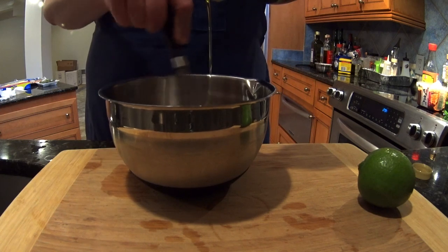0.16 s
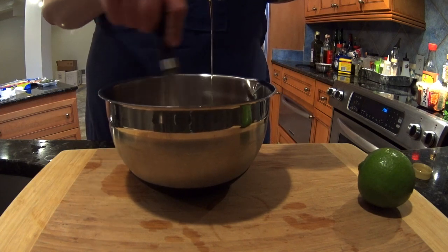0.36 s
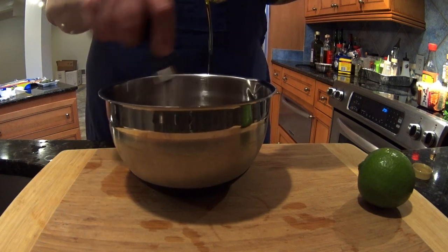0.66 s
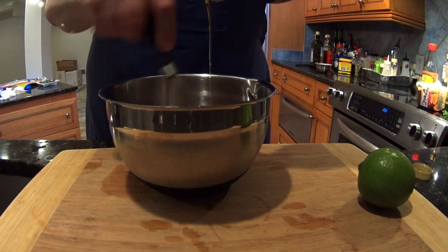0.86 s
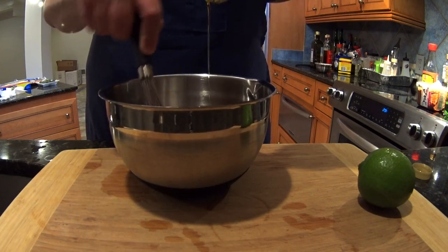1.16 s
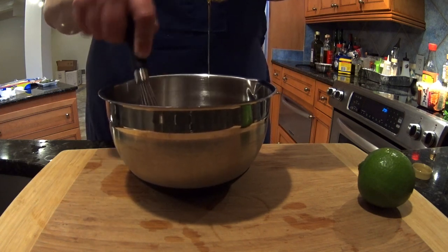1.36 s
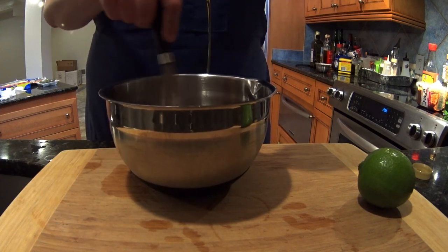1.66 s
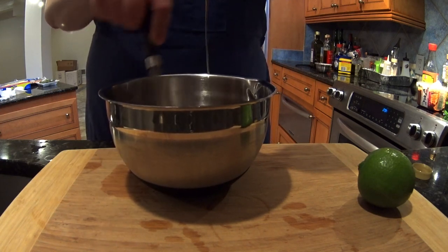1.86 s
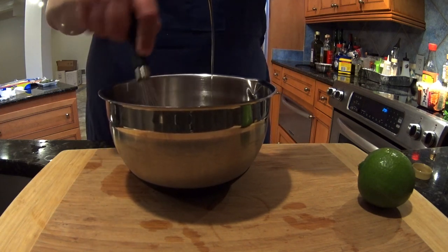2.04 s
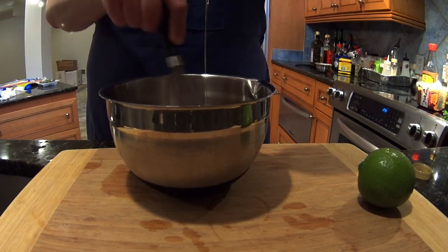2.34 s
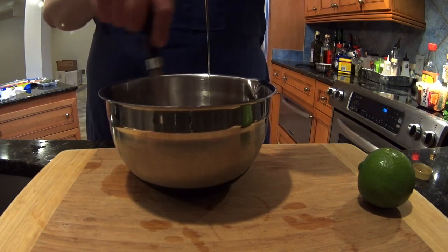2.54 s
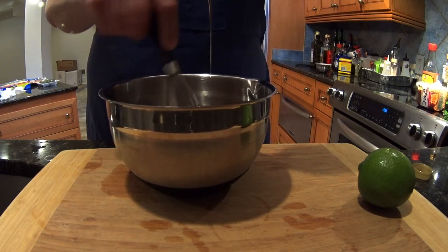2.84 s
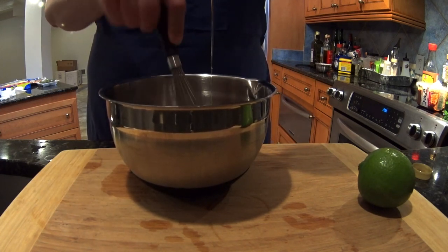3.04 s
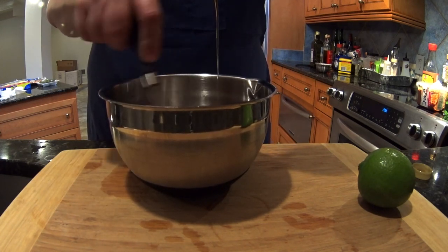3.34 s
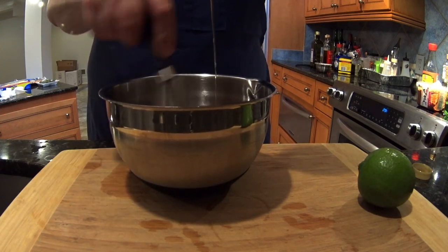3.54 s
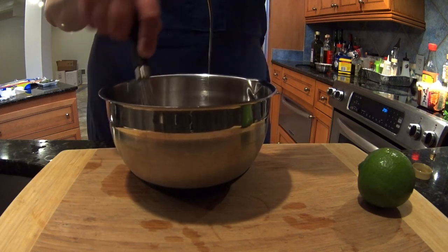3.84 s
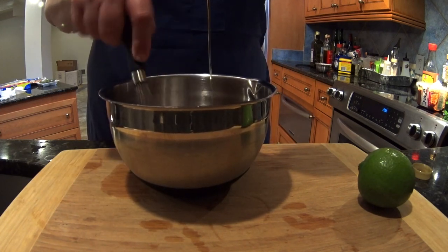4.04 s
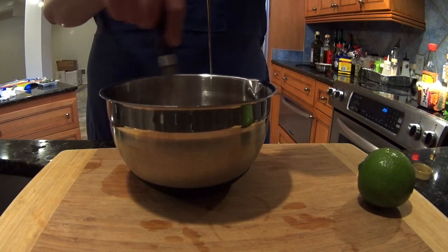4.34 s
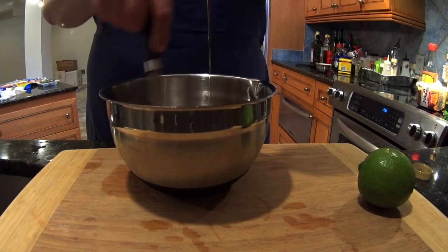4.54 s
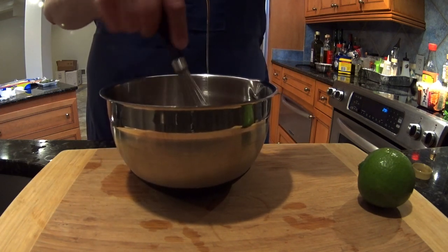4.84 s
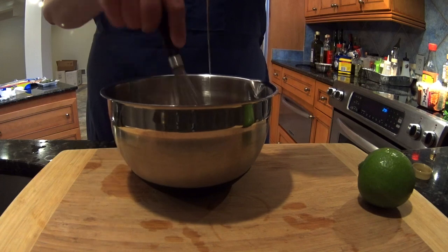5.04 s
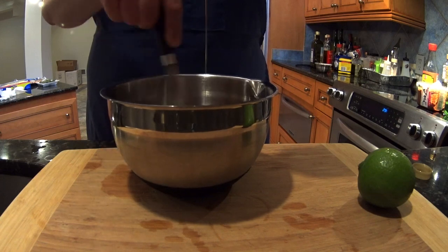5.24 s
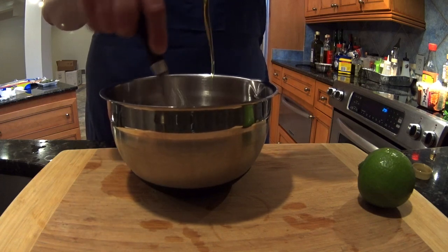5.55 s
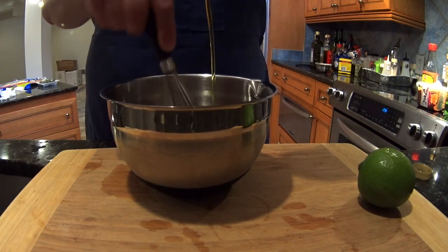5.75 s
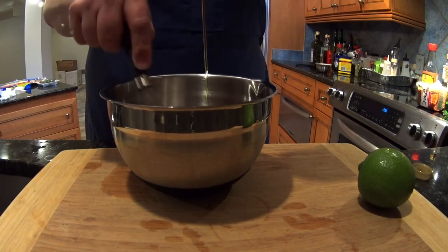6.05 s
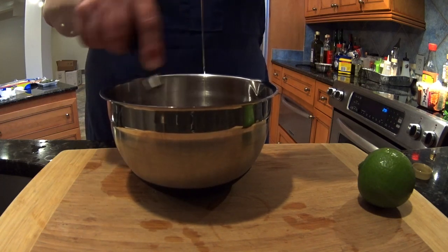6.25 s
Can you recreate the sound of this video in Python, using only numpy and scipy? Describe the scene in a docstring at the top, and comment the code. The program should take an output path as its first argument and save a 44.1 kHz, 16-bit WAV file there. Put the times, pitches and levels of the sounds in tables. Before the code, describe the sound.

A wire whisk beats a thick paste in a steel bowl, heard close up. From the first moment the wires click, rattle and scrape on the wall in quick, uneven strokes, bright and metallic but damped by the paste. Beneath them the rocking bowl gives soft, woody thuds and a slight grinding on a wooden board. At about 0.4 seconds comes the first of a dozen scattered blows that set the bare rim ringing lightly, clearest around 1.7, 3.3, 4.4 and 5.3 seconds. The thuds are strongest between 4.4 and 5 seconds, where the clicking is also busy. From about 5.6 seconds the beating eases briefly, then the scraping swells with a sharp click just before the sound ends at 6.4 seconds. The small kitchen adds a very short echo and a faint, steady low hum.

```python
"""A wire whisk beats a thick paste in a steel bowl on a wooden board, in a small, humming kitchen.
From the first moment the wires rattle and scrape on the wall, which the paste muffles, and the
rocking bowl thuds on the board. At 0.4 seconds comes the first of a dozen blows that set the bare
rim ringing. The thuds are strongest between 4.4 and 5 seconds. The beating then eases briefly,
and the scraping swells as the sound ends at 6.4 seconds."""
import sys
import numpy as np
from scipy import signal
from scipy.fft import rfft, irfft
from scipy.io import wavfile
from scipy.ndimage import uniform_filter1d

SR = 44100
rng = np.random.default_rng(int(sys.argv[2]) if len(sys.argv) > 2 else 0)


def master_out(mix):
    """Clip the mix to full scale and print it as 16-bit PCM to the path in sys.argv[1]."""
    frames = np.transpose(np.atleast_2d(mix))
    ceiling = np.clip(frames, -1, 1)
    pcm = np.round(ceiling * 32767).astype(np.int16)
    wavfile.write(sys.argv[1], SR, pcm)


N = 282240

# Wires landing on the wall. Each row: start in seconds, peak level of the body in dB, levels of the
# boom, clank and sizzle in dB, pitches of the boom, clank and bright spot in Hz, strength of that spot
# in dB, rattle length in seconds.
WIRE_HITS = [(0.054, -26.5, -35.5, -35, -29, 636, 1750, 4190, 21.5, 0.052),
             (0.0715, -17.5, -52, -39, -40, 770, 1400, 4730, 19, 0.025),
             (0.107, -31, -54, -39.5, -50, 780, 1380, 3130, 14, 0.16),
             (0.1698, -25, -51, -39, -39, 624, 1800, 2830, 6, 0.057),
             (0.189, -16.5, -38, -41, -27, 793, 1650, 6650, 10, 0.088),
             (0.253, -29, -49, -44, -36, 473, 1245, 4550, 24, 0.14),
             (0.3712, -21.5, -44, -33, -55, 594, 1760, 3900, 6, 0.067),
             (0.3824, -22, -42.5, -37, -40, 660, 1337, 3760, 7, 0.082),
             (0.3958, -19, -33.5, -36, -27, 790, 1260, 6500, -7, 0.11),
             (0.4724, -35, -42, -46, -39.5, 683, 1190, 5000, 16, 0.098),
             (0.4834, -22, -41.5, -39, -44, 540, 1315, 2700, 8.5, 0.046),
             (0.5121, -36, -55, -67, -46, 560, 1540, 5260, 29, 0.095),
             (0.5282, -17, -57, -34.5, -44, 748, 1430, 2855, 28, 0.08),
             (0.5837, -19, -51, -42, -56, 770, 1710, 2980, 6, 0.088),
             (0.606, -12, -37, -21.5, -35, 647, 1173, 2960, 9, 0.057),
             (0.6926, -23, -41.5, -39, -30.5, 627, 1167, 2820, 16, 0.081),
             (0.766, -23, -66, -45, -49, 660, 1460, 2670, 9, 0.11),
             (0.812, -17.5, -42, -28, -34.5, 740, 1272, 4100, -8, 0.068),
             (0.828, -14.5, -41, -36, -37, 806, 1360, 3100, 4, 0.04),
             (0.8615, -30, -59, -37, -43, 670, 1370, 3100, 8.5, 0.071),
             (0.875, -23.5, -53, -30.5, -47, 684, 1446, 4250, 18, 0.041),
             (0.9119, -19.5, -35.5, -35, -30, 604, 1300, 3200, 14, 0.072),
             (1.0225, -17.5, -52, -31, -43, 630, 1266, 3620, 17, 0.077),
             (1.119, -18.5, -64, -59, -36.5, 894, 1490, 2650, 13, 0.091),
             (1.1324, -24, -34.5, -41, -36, 644, 1310, 4200, 10, 0.044),
             (1.1808, -18.5, -49, -42, -41, 715, 1310, 3190, 8.5, 0.05),
             (1.23, -19, -51, -37, -32, 626, 1270, 3170, 14, 0.13),
             (1.2902, -52, -55, -34.5, -64, 673, 1280, 2790, 8.5, 0.047),
             (1.3324, -20.5, -44, -37, -36.5, 597, 1294, 2880, 16, 0.16),
             (1.3875, -12, -52, -53, -34.5, 620, 1950, 3100, 14, 0.051),
             (1.4355, -23, -48, -36, -48, 614, 1294, 3000, 5, 0.072),
             (1.4509, -21, -49, -34, -43, 790, 1315, 4900, 14, 0.065),
             (1.5227, -21.5, -66, -65, -53, 770, 1640, 2870, 26, 0.038),
             (1.55, -19.5, -41.5, -35, -35, 495, 1300, 2820, 21, 0.053),
             (1.5894, -25, -53, -62, -38, 623, 1400, 4470, 4, 0.027),
             (1.6055, -30, -45, -30.5, -63, 750, 1810, 2780, 21, 0.064),
             (1.6426, -25, -53, -37, -52, 710, 1380, 3080, 20, 0.049),
             (1.7286, -25.5, -58, -39, -58, 620, 1330, 3960, 23, 0.074),
             (1.7845, -11.5, -34.5, -33.5, -30, 717, 1340, 2800, -8, 0.058),
             (1.963, -25, -53, -28.5, -43, 610, 1293, 3000, -3, 0.048),
             (2.127, -24, -52, -29, -57, 715, 1280, 3600, 21, 0.066),
             (2.2228, -25.5, -55, -47, -40.5, 584, 1790, 3120, 18, 0.18),
             (2.2351, -14.5, -31, -33, -28.5, 630, 1870, 2780, 14, 0.025),
             (2.285, -31, -43.5, -34.5, -42, 685, 1860, 2880, 13, 0.11),
             (2.334, -34, -69, -35, -52, 870, 1820, 2970, 3, 0.11),
             (2.3646, -25, -44, -32, -30, 764, 1368, 7440, -15, 0.089),
             (2.4406, -18.5, -40.5, -38, -34.5, 633, 1277, 2710, 8, 0.13),
             (2.483, -32, -64, -59, -41, 810, 1440, 2800, 7, 0.11),
             (2.5779, -19, -53, -36.5, -51, 720, 1290, 3730, 17, 0.075),
             (2.6354, -29, -76, -43, -63, 684, 1500, 2820, 15, 0.045),
             (2.6841, -17.5, -36.5, -58, -35, 660, 1300, 2920, 5, 0.091),
             (2.7236, -16.5, -51.5, -36.5, -48, 780, 1266, 4130, 22, 0.12),
             (2.7905, -21.5, -48, -34, -57, 654, 1385, 2930, 3, 0.056),
             (2.819, -18, -54, -45, -32.5, 626, 1410, 6900, 14, 0.049),
             (2.9076, -16.5, -34.5, -43, -35, 588, 1286, 3400, 5, 0.065),
             (2.9427, -37, -54, -52, -49, 720, 1460, 3020, 13, 0.25),
             (3.026, -27, -63, -63, -33.5, 705, 1560, 6810, 15, 0.14),
             (3.114, -26, -56, -64, -38, 660, 1290, 4100, 9, 0.29),
             (3.1389, -20.5, -38, -35, -32.5, 490, 1440, 7000, 8, 0.068),
             (3.2105, -27, -65, -42, -40.5, 796, 1315, 7150, 11, 0.18),
             (3.2465, -25, -47, -37, -29, 580, 1307, 4000, 5, 0.046),
             (3.3142, -44, -62, -25.5, -41, 598, 1320, 4160, 27, 0.02),
             (3.355, -22, -37, -32.5, -29.5, 625, 1168, 3320, 25, 0.043),
             (3.3642, -17.5, -57, -51, -54, 656, 1350, 4030, 3, 0.13),
             (3.495, -18, -41.5, -35, -36.5, 810, 1746, 2920, 9, 0.046),
             (3.5254, -47, -42, -60, -28, 624, 1800, 6900, 1, 0.047),
             (3.5822, -29, -39, -34.5, -30.5, 593, 1290, 6560, -6, 0.04),
             (3.6245, -35, -45, -56, -42, 806, 1320, 4330, 10, 0.16),
             (3.691, -22, -46, -34.5, -50, 740, 1275, 3250, 6, 0.068),
             (3.708, -21, -46, -32, -51, 770, 1320, 3700, 26, 0.031),
             (3.798, -15, -52, -44, -36, 790, 1180, 2680, 18, 0.11),
             (3.8793, -33, -47, -41, -51, 790, 1370, 2940, 6, 0.11),
             (3.9136, -21, -55, -30.5, -59, 710, 1263, 2900, 3, 0.071),
             (3.937, -21.5, -41, -55, -40, 820, 1250, 3600, 14, 0.055),
             (3.964, -34, -46, -45, -33.5, 650, 1840, 6570, 9, 0.079),
             (4.003, -30, -54, -43, -43, 700, 1230, 2670, 35, 0.047),
             (4.0287, -22.5, -37, -47, -31, 820, 1260, 3280, 16, 0.049),
             (4.0484, -21.5, -46, -41, -51, 800, 1820, 2730, 28, 0.043),
             (4.1247, -19.5, -66, -34, -54, 700, 1318, 4950, 23, 0.29),
             (4.1751, -16, -39.5, -32.5, -30, 790, 1397, 6770, 8, 0.05),
             (4.247, -27, -39, -43, -29.5, 500, 1230, 7160, 1, 0.059),
             (4.2855, -21, -38.5, -47, -47, 732, 1480, 4530, 12, 0.086),
             (4.345, -31, -44, -39.5, -31.5, 799, 1510, 7240, 4, 0.048),
             (4.371, -20.5, -43, -44, -32.5, 805, 1700, 3720, 7, 0.082),
             (4.469, -23, -35.5, -30, -32, 490, 1215, 4310, 20, 0.059),
             (4.584, -20, -45, -40, -44, 840, 1294, 2710, -6, 0.15),
             (4.6932, -20, -40, -40.5, -33.5, 557, 1460, 2700, 4, 0.078),
             (4.7342, -23, -39, -46, -58, 650, 1670, 4260, 8, 0.079),
             (4.8092, -15, -46.5, -33, -61, 490, 1290, 3100, 10, 0.062),
             (4.8367, -17, -57, -36, -39, 810, 1370, 3670, 9, 0.073),
             (4.9117, -22.5, -34, -42, -32.5, 635, 1250, 2960, 15, 0.059),
             (4.959, -30, -56, -44, -51, 670, 1860, 4200, 18, 0.075),
             (5.0265, -20, -55, -40, -31, 644, 1560, 3070, 10, 0.12),
             (5.0496, -17.5, -64, -32, -41, 660, 1367, 4030, 16, 0.038),
             (5.0914, -20, -50, -30, -51, 684, 1427, 4000, 12, 0.04),
             (5.1417, -18, -31, -39.5, -24.5, 645, 1320, 3600, 16, 0.03),
             (5.1737, -34, -40, -44, -55, 720, 1380, 2730, 7, 0.051),
             (5.241, -15, -39.5, -42, -49, 650, 1490, 2900, -2, 0.053),
             (5.2554, -22, -51, -39, -26.5, 586, 1760, 6820, 11, 0.083),
             (5.2968, -25, -68, -28.5, -56, 643, 1393, 3800, 21, 0.058),
             (5.365, -18, -31, -36, -29.5, 666, 1360, 2880, -4, 0.058),
             (5.455, -22, -59, -35, -45, 785, 1400, 3100, 0, 0.06),
             (5.4866, -18.5, -71, -44, -51, 663, 1300, 2770, -1, 0.07),
             (5.5541, -19, -66, -40, -72, 615, 1280, 3550, -2, 0.066),
             (5.5939, -22, -34.5, -37, -58, 735, 1340, 2660, 24, 0.065),
             (5.6543, -34, -67, -39, -66, 730, 1290, 3850, 0, 0.057),
             (5.7095, -26, -49, -53, -39, 790, 1530, 3100, 5, 0.047),
             (5.756, -24.5, -63, -44, -47, 580, 1260, 4740, 17, 0.085),
             (5.8131, -29.5, -69, -66, -44, 705, 1850, 4140, 23, 0.17),
             (5.9204, -26.5, -44.5, -44, -73, 650, 1320, 3050, 22, 0.034),
             (5.9608, -27, -46.5, -52, -39.5, 600, 1264, 6750, 0, 0.066),
             (6.042, -23, -40.5, -35.5, -32.5, 580, 1320, 2720, 25, 0.063),
             (6.0661, -21, -30.5, -48, -42, 788, 1850, 2630, 23, 0.06),
             (6.138, -20, -61, -60, -68, 635, 1450, 3950, -5, 0.1),
             (6.1639, -25, -44.5, -36, -47, 632, 1314, 2960, 14, 0.13),
             (6.225, -22.5, -51, -52, -48, 660, 1340, 4180, 25, 0.048),
             (6.267, -14, -35, -41, -31.5, 740, 1880, 4070, 16, 0.052),
             (6.3063, -19, -68, -46, -36, 762, 1900, 2810, 25, 0.097)]
# The wall's modes (its natural tones) under the paste. Each row: width in Hz, level in dB.
WALL_MODES = [(14, -6), (74, -1.5), (39.8, -3.5), (104, -1.5), (28.6, 3.5), (53.3, 4.5), (64.6, 1),
              (29.5, 7), (73.5, 8.5), (60.4, 10.5), (60.4, 3), (100, 8), (86.5, 1.5), (55.6, 2.5),
              (194, -1.5), (97, 6), (88.6, -4.5), (11.6, 6), (16, 2), (17.9, 3.5), (29.3, -2.5), (30, -8),
              (13.8, -11), (24.9, 5), (87.5, -4.5), (80, 0.5), (810, -9.5)]


def wire_rattles(size=4096):
    """Wires land one after another in short rattles that shake the wall; light touches fall at random."""
    # One wire snapping on the wall. Each row: the same as in WIRE_HITS, without the rattle length.
    snaps = [(0.2756, -10.5, -42, -43, -48, 620, 1940, 2780, 28),
             (0.539, -16, -40, -37, -37, 710, 1440, 2590, 19),
             (0.7388, -12.5, -58, -34, -41, 660, 1760, 2830, 21),
             (1.047, -16.5, -50, -34, -38, 780, 1370, 3150, 9),
             (1.6715, -21.5, -50, -42, -30.5, 802, 1870, 3800, 1),
             (1.9905, -15.5, -36.5, -41, -39.5, 713, 1303, 3000, 16),
             (2.0339, -13, -45, -40, -42.5, 755, 1310, 4150, 5),
             (2.502, -11.5, -48, -32, -35.5, 726, 1430, 2930, 14),
             (3.4058, -13.5, -53, -33, -33.5, 676, 1315, 4160, 23),
             (3.467, -15, -56, -39, -51, 644, 1760, 4330, 13),
             (3.8505, -28, -42.5, -30.5, -47, 720, 1320, 4800, 25),
             (4.3003, -13, -40, -42.5, -29, 780, 1370, 4540, 16.5),
             (4.774, -15.5, -42, -27.5, -39, 650, 1315, 2820, 12),
             (4.9829, -10.5, -34.5, -34.5, -33.5, 626, 1295, 4640, 20),
             (5.3907, -10, -63, -58, -44, 610, 1580, 5090, 22),
             (5.4093, -12, -47, -27, -33, 727, 1355, 2980, 18),
             (6.3375, -9, -44, -34, -39, 759, 1820, 4350, 12),
             (0.8041, -25, -42, -33, -33, 630, 1370, 2730, 6),
             (1.0821, -27, -63, -48, -50, 680, 1380, 4200, 11),
             (1.1486, -22, -42, -38, -50, 703, 1500, 4200, 16),
             (1.2374, -13, -45, -35, -28, 755, 1275, 7000, 8),
             (1.3484, -23, -35, -40, -39, 576, 1260, 4870, 27),
             (1.36, -14, -50, -37, -38, 662, 1440, 4550, 20),
             (1.817, -22, -48, -39, -42, 783, 1330, 2860, 9),
             (1.8975, -31, -56, -34, -32.5, 620, 1307, 7160, -4),
             (2.1752, -24, -50, -41, -42, 690, 1320, 3000, 7),
             (2.8693, -27, -47, -50, -56, 603, 1340, 3410, 9),
             (3.4462, -24, -57, -39, -36, 810, 1400, 2820, 17),
             (3.8126, -24, -45, -37, -38, 483, 1900, 2720, 16),
             (4.0198, -23, -46, -44, -34, 810, 1300, 3250, 14),
             (4.1674, -32, -36, -36, -35, 786, 1424, 6700, 9),
             (4.2615, -20, -40, -38, -47, 646, 1930, 2680, 20),
             (4.487, -23.5, -46, -49, -30, 707, 1310, 4220, 17),
             (4.606, -25, -57, -34, -31.5, 790, 1420, 6140, 8),
             (4.7134, -24, -38, -57, -47, 613, 1300, 2700, 15),
             (4.794, -22, -53, -35, -52, 794, 1280, 2960, 14),
             (4.8202, -17, -50, -36, -52, 480, 1360, 3540, 17),
             (4.9285, -18, -39, -44, -38, 710, 1520, 3150, 8),
             (4.9714, -15.5, -44, -47, -40, 656, 1340, 4840, 13),
             (5.1092, -21, -56, -56, -50, 654, 1550, 4020, 31),
             (5.617, -26, -70, -37, -61, 727, 1250, 3030, 8),
             (5.8302, -30, -43, -58, -43, 730, 1300, 4360, 20),
             (3.4072, -15, -55, -45, -45, 676, 1307, 2960, 19),
             (2.961, -28, -40.5, -34.5, -45, 740, 1390, 2950, 12)]
    # The boom, clank, body and sizzle bands. Each row: lower edge in Hz, upper edge in Hz.
    bands = [(450, 900), (1100, 1950), (2200, 5500), (5800, 10000)]
    snap_s, touch_s, contact_s, touches_per_s = 0.034, 0.044, 0.00059, 5
    hits = np.transpose(WIRE_HITS + [(*row, snap_s) for row in snaps])
    starts, body_db, boom_db, clank_db, sizzle_db, boom_hz, clank_hz, spot_hz, spot_db, rattle_s = hits
    touches = int(touches_per_s * N / SR)
    when, place = rng.random((touches, 2)).T
    touch_db = np.array([-46, -40, -26, -54]) + 1.5 * rng.standard_normal((touches, 4))
    band_db = np.vstack([np.transpose([boom_db, clank_db, body_db, sizzle_db]), touch_db])
    band_db[:, 2] -= 10.5  # the body's average level lies this far under its peak
    starts = np.r_[starts, when * N / SR]
    rattle_s = np.r_[rattle_s, np.full(touches, touch_s)][:, None]
    t, hz = np.arange(size) / SR, np.arange(size // 2 + 1) * SR / size
    fade_s = 0.75 * np.clip(rattle_s, .015, .3) / np.log(1000)
    rise_s = 5.7 * fade_s ** 2  # a long rattle also builds up more slowly
    envelope = (1 - np.exp(-t / rise_s)) * np.exp(-t / fade_s)
    rattle = slip_clicks(envelope.shape, per_s=2600, spread_db=2.1) * envelope
    first_wire = t / contact_s * np.exp(-t / contact_s) / np.sqrt(contact_s * SR / 2)
    hardness = undb(15.5) * np.exp(-(rattle_s / 0.045) ** 4)  # short rattles open with a hard landing
    rattle += hardness * first_wire * rng.choice([-1, 1], rattle.shape)
    wall = wall_response(hz, 5.7 * rng.standard_normal((len(starts), len(WALL_MODES))), tick_db=-2.0)
    # Each place struck adds three tones. Squaring makes two swell softly, as if cushioned by paste.
    boom_hz = np.r_[boom_hz, np.full(touches, 644)][:, None]
    clank_hz = np.r_[clank_hz, rng.uniform(1250, 1315, touches)][:, None]
    spot_hz = np.r_[spot_hz, 2700 * 2.7 ** place][:, None]
    spot_db = np.r_[spot_db, np.full(touches, 8)][:, None]
    wall += undb(7) * resonance(hz, boom_hz, width_hz=91) ** 2
    wall += undb(16.5) * resonance(hz, clank_hz, width_hz=78) ** 2
    wall += undb(spot_db) * resonance(hz, spot_hz, width_hz=101)
    spectra = rfft(rattle) * wall * hz ** 2 / (hz ** 2 + 330 ** 2)  # the wall gives off little bass
    # Bring each band to its level; a longer rattle carries more energy.
    power = abs(spectra) ** 2 * 2 / size
    energy = np.transpose([power[:, (hz > low) & (hz < high)].sum(1) for low, high in bands])
    gain_db = band_db - 10 * np.log10(energy / ((fade_s + 0.00062) * SR))
    log_centres = np.log(np.prod(bands, 1)) / 2
    colour_db = np.array([np.interp(np.log(hz + 1), log_centres, row) for row in gain_db])
    return place_sounds(np.zeros(N), irfft(spectra * undb(colour_db)), starts)


def wire_scrape(size=4096, hop=512):
    """Wires slip along the wall in short overlapping patches, each with its own tone colour."""
    # The steady drag of the wires. Each row: time in seconds, level in dB.
    drag_levels = [(0.0, -41), (0.12, -39.5), (0.64, -38), (1.09, -39), (1.28, -38), (2.16, -38),
                   (3.24, -38), (3.37, -37.5), (3.62, -38), (4.15, -40), (4.3, -37.5), (4.76, -41),
                   (4.95, -39), (5.45, -37.5), (5.81, -40), (6.13, -44), (6.4, -32)]
    # The whisk lifting off at the end of a stroke. Each row: time in seconds, dip in dB.
    lifts = [(.03, -4.5), (.45, -3), (.9, -13), (1.09, -3), (1.27, -5.5), (1.5, -5.5), (1.76, -10),
             (1.941, -7), (2.201, -10), (2.659, -4.5), (3.075, -6), (3.56, -6), (3.78, -7.5), (3.99, -8),
             (4.22, -4), (4.45, -5), (4.885, -7.5), (5.29, -17), (5.52, -8.5), (5.74, -11), (5.88, -2)]
    lift_width_s, full_treble_db = 0.028, -16.5
    hz = np.arange(size // 2 + 1) * SR / size
    starts = np.arange(-hop, N, hop) / SR
    t = starts + hop / SR
    lift_s, dip_db = np.transpose(lifts)
    dips = np.exp(-((t[:, None] - lift_s) / lift_width_s) ** 2)
    steady_db = np.interp(t, *np.transpose(drag_levels)) + dips @ dip_db
    hit_s, hit_db = np.transpose(WIRE_HITS)[:2]
    press = swell(t, hit_s, hit_db - 15, rise_s=0.0065, fade_s=0.013)  # wires press on as they land
    drag = np.hypot(undb(steady_db), press)[:, None]
    window = np.sin(np.pi * np.arange(2 * hop) / (2 * hop))
    slips = slip_clicks((len(starts), 2 * hop), per_s=3000, spread_db=2.2) * window
    place_db = 6.56 * uniform_filter1d(rng.standard_normal((len(starts), len(WALL_MODES))), 2, axis=0)
    treble = 1 / (1 + (5000 / (hz + 1)) ** 4)
    tilt = 1 - treble + treble * (drag / undb(full_treble_db)) ** 0.14  # harder drag is brighter
    patches = irfft(rfft(slips, size) * wall_response(hz, place_db, tick_db=-0.35))
    gain = drag / np.sqrt(np.sum(patches ** 2) / N)
    return place_sounds(np.zeros(N), irfft(rfft(patches) * tilt) * gain, starts)


def slip_clicks(shape, per_s, spread_db):
    """Wires stick and slip, making clicks of uneven size over a little hiss."""
    slips = rng.random(shape) < per_s / SR
    sizes = undb(spread_db * np.minimum(rng.exponential(size=shape), 3.5))
    return slips * sizes * rng.choice([-1, 1], shape) + 0.086 * rng.standard_normal(shape)


def wall_response(hz, place_db, tick_db, coats=12, wire_modes=30):
    """Each touch sounds the wall's tones, shifted by a coat of paste, plus the tick of the wet wires."""
    # The wall's pitches in Hz, one for each row of WALL_MODES.
    wall_hz = [490, 635, 790, 1200, 1292, 1390, 1810, 2388, 2520, 2600, 2720, 2900, 3080, 3400, 4150, 4720,
               5980, 6297, 6460, 6576, 6790, 6900, 6970, 7040, 7290, 7680, 8430]
    # The broad tone colour of a wire's tick. Each row: frequency in Hz, level in dB.
    tick_colour = [(180, -41), (300, -41), (624, -10), (957, -8.5), (1300, 3.5), (2050, -7), (2540, 3),
                   (5450, -1.5), (7060, -1.5), (11000, -23), (11500, -75)]
    width_hz, mode_db = np.transpose(WALL_MODES)[:, :, None]
    mode_gain = (-1) ** np.arange(len(WALL_MODES))[:, None] * undb(mode_db)
    touches = len(place_db)
    coat = rng.integers(coats, size=touches)
    wall = np.zeros((touches, len(hz)), complex)
    bare_tick = undb(-7) + (1 - undb(-7)) / (1 + (hz / 4300) ** 6)
    wires = np.zeros_like(wall) + bare_tick
    wire_hz = rng.uniform(4300, 10800, size=(coats, wire_modes, 1))
    wire_gain = undb(-1 + 5.5 * rng.standard_normal((touches, wire_modes)))
    wire_gain *= rng.choice([-1, 1], wire_gain.shape)
    paste_shifts_hz = 0.46 * width_hz * rng.standard_normal((coats, len(WALL_MODES), 1))
    for k, shift_hz in enumerate(paste_shifts_hz):
        modes = mode_gain * resonance(hz, np.c_[wall_hz] + shift_hz, width_hz)
        wall[coat == k] = undb(place_db[coat == k]) @ modes
        wires[coat == k] += wire_gain[coat == k] @ resonance(hz, wire_hz[k], width_hz=59)
    # Every tick gets its own louder and duller stretches of frequency.
    grid_hz = np.linspace(0, SR / 2, num=40)
    uneven_db = np.array([np.interp(hz, grid_hz, row) for row in 3 * rng.standard_normal((touches, 40))])
    return wall + undb(tick_db + read_curve(tick_colour, hz) + uneven_db) * wires


def rim_ring():
    """The steel above the paste rings long and clear; the place struck favours some families of tones."""
    # The rim's tones. Each row: pitch in Hz, level in dB, seconds to fade by 60 dB, family number.
    tones = [(830, -14, 2.5, 4), (1572, -7, 1.5, 1), (1675, -3, 1.8, 4), (2388, -3, 1.3, 1),
             (2530, 0, 1.1, 2), (2863, -9, .6, 2), (3160, 2, .9, 1), (3871, 0, .7, 0), (4225, 0, 1.2, 3),
             (4646, -2, .7, 1), (5168, -5, .6, 4), (5675, -5, .7, 1), (5712, -1, .75, 4), (6297, 0, .3, 5),
             (6460, -16, .3, 5), (6576, -9, .4, 1), (6790, -10, .25, 2)]
    # Blows on the rim. Each row: start in seconds, then the levels of families 0 to 5 in dB.
    blows = [(0.399, -51, -66, -63, -57, -50, -61), (1.237, -61, -62, -41, -60, -60, -41),
             (1.683, -37.5, -62, -44, -44, -65, -60), (3.031, -46, -41, -58, -43, -67, -45),
             (3.251, -43, -44, -32, -34, -68, -47), (3.803, -59, -54, -59, -62, -55, -58),
             (4.372, -39, -45.5, -37, -38, -41, -40), (4.607, -62, -62, -46, -64, -67, -44),
             (4.838, -67, -70, -53, -72, -70, -44), (5.05, -38, -61, -40, -62, -65, -55),
             (5.256, -40, -42, -35.5, -62, -47, -52), (5.409, -53, -43.5, -42, -60, -46, -55)]
    starts, *family_db = np.transpose(blows)
    return sum(struck_tone(starts, db + family_db[int(k)], hz, ring_s) for hz, db, ring_s, k in tones)


def board_thuds():
    """The rocking bowl thuds on the board with a woody knock, and its foot grinds round each time."""
    # The foot landing. Each row: start in seconds, levels of the low, middle and high board tone in dB.
    landings = [(0.056, -50, -56, -79), (0.194, -51, -56, -52.5), (0.238, -44, -52, -48),
                (0.395, -56, -68, -52.5), (0.453, -43, -51, -50.5), (0.524, -48, -69, -60),
                (0.64, -53, -52, -50), (0.702, -43, -54, -77), (0.741, -55, -54, -74),
                (0.842, -67, -55, -49), (0.919, -50, -48, -52), (1.13, -49, -50, -55),
                (1.297, -64, -50, -63), (1.347, -54, -50, -55), (1.514, -49, -48, -60),
                (1.554, -53, -49, -56), (1.676, -80, -81, -51), (1.78, -52, -59, -54),
                (1.965, -52, -57, -59.5), (2.15, -72, -53, -52), (2.229, -49, -52, -66),
                (2.373, -55, -66, -56.5), (2.439, -51, -53, -60), (2.577, -70, -59, -56.5),
                (2.686, -58, -51.5, -75), (2.83, -63, -53, -48.5), (2.91, -49, -43.5, -50),
                (3.135, -47.5, -57, -50.5), (3.257, -54, -55, -58), (3.31, -53, -69, -66),
                (3.368, -47, -49, -55.5), (3.578, -49, -47, -55.5), (3.768, -49, -47, -54.5),
                (3.939, -57, -55, -52), (4.019, -43, -68, -51), (4.184, -50, -62, -43.5),
                (4.219, -56, -50, -64), (4.259, -46, -63, -65), (4.298, -43, -48, -49.5),
                (4.378, -54, -66, -56), (4.44, -45.5, -37, -45.5), (4.489, -48, -40, -50),
                (4.529, -43, -45, -52), (4.665, -43, -43, -52.5), (4.696, -46, -53, -61),
                (4.747, -41, -43, -58), (4.888, -45, -46, -48.5), (4.92, -61, -53, -56),
                (4.973, -38.5, -41, -44.5), (5.104, -44, -62, -56), (5.173, -45, -45, -53.5),
                (5.263, -56, -55, -74), (5.309, -47, -51, -66), (5.37, -63, -48.5, -50.5),
                (5.489, -60, -59, -55), (5.59, -56, -56, -66), (5.763, -55, -56, -58.5),
                (5.968, -68, -61, -51.5), (6.039, -45.5, -48, -52), (6.281, -52, -55, -55)]
    # The board's tones. Each row: pitch in Hz, seconds to fade by 60 dB.
    tones = [(112, 0.031), (157, 0.43), (354, 0.45)]
    starts, *levels = np.transpose(landings)
    thuds = sum(struck_tone(starts, db, hz, ring_s) for db, (hz, ring_s) in zip(levels, tones))
    hz = np.arange(N // 2 + 1) * SR / N
    rumble = resonance(hz, tones[0][0], 55) + 0.57 * resonance(hz, tones[1][0], 1.7)
    rumble /= 1 + (hz / 220) ** 4
    creak = 0.5 * resonance(hz, 286.4, 6) + 0.34 * resonance(hz, 450, 64)  # higher tones of the board
    grind = irfft(rfft(rng.standard_normal(N)) * rumble + rfft(rng.standard_normal(N)) * creak, N)
    steps = np.linspace(0, N / SR, num=2000)
    grind_gain = swell(steps, starts, levels[0] - 6.5, rise_s=0.026, fade_s=0.061)
    grind *= np.interp(np.arange(N) / SR, steps, grind_gain) / np.std(grind)
    t = np.arange(SR // 10) / SR
    knock_hz = 644 * (1 + 0.16 * rng.standard_normal((len(starts), 1)))
    knocks = undb(levels[1] + 7.5)[:, None] * np.sin(2 * np.pi * knock_hz * t) * decay(t, ring_s=0.041)
    bass_cut = signal.butter(10, 97.5, "high", fs=SR, output="sos")  # a small board gives no deep bass
    return signal.sosfilt(bass_cut, place_sounds(thuds + grind, knocks, starts))


def kitchen_echo(sound, level_db=-16, cutoff_hz=9000):
    """The small room answers with a short, dulled echo, different on each side."""
    t = np.arange(SR // 2) / SR
    tail = rng.standard_normal((2, len(t))) * decay(t, ring_s=0.14) * (t > .004)
    tail = signal.lfilter(*signal.butter(1, cutoff_hz, fs=SR), tail)
    tail *= undb(level_db) / np.sqrt(np.sum(tail ** 2, 1, keepdims=True))
    return signal.fftconvolve(sound[None], tail, axes=1)[:, :N]


def house_hum(level_db=-67):
    """The house rumbles faintly, mostly the same on both sides."""
    # The rumble's tone colour. Each row: frequency in Hz, relative level in dB.
    hum_colour = [(25, -26), (50, -30), (60, 9), (72, -48), (100, 10.5), (200, -4.5), (240, 10), (260, -4),
                  (280, 8), (310, 7), (450, -3.5), (700, 4.5), (1400, -80)]
    hz = np.arange(N // 2 + 1) * SR / N
    mid, side = irfft(rfft(rng.standard_normal((2, N))) * undb(read_curve(hum_colour, hz)), N)
    return np.array([mid + 0.88 * side, mid - 0.34 * side]) / np.std(mid) * undb(level_db)


def struck_tone(starts, dbs, hz, ring_s):
    """One tone that is set ringing by each blow and then dies away."""
    blows = np.zeros(N)
    np.add.at(blows, (starts * SR).astype(int), undb(dbs))
    step = np.exp(2j * np.pi * hz / SR) * decay(1 / SR, ring_s)
    return signal.lfilter([1], [1, -step], blows).imag


def resonance(hz, centre_hz, width_hz):
    """How one damped mode answers each frequency, with gain 1 at its centre."""
    return 1j * hz * width_hz / (centre_hz ** 2 - hz ** 2 + 1j * hz * width_hz)


def swell(t, times, dbs, rise_s, fade_s):
    """A gain that rises towards each given time and fades after it."""
    late = t[:, None] - times
    power = undb(dbs) ** 2 * np.exp(np.where(late < 0, 2 * late / rise_s, -2 * late / fade_s))
    return np.sqrt(power.sum(1))


def decay(t, ring_s):
    """A fade that falls by 60 dB in ring_s seconds."""
    return np.exp(-np.log(1000) * t / ring_s)


def place_sounds(track, sounds, starts):
    """Adds each sound to the track at its start time."""
    for sound, start in zip(sounds, starts):
        i = max(int(start * SR), 0)
        track[i:i + len(sound)] += sound[:N - i]
    return track


def read_curve(table, hz):
    """Reads between the rows of a (Hz, value) table on a logarithmic frequency scale."""
    row_hz, values = np.transpose(table)
    return np.interp(np.log(hz + 1), np.log(row_hz + 1), values)


def undb(db):
    """Turns decibels into a gain."""
    return 10 ** (np.asarray(db) / 20)


def scene():
    """Bowl and board reach left and right a little differently; echo and hum lie behind them."""
    # Each row: frequency in Hz, left level minus right level in dB.
    left_db = [(110, 0.5), (350, -1), (620, -1), (1120, -5.5), (2000, 0), (3600, -0.5), (8000, 0)]
    # Each row: frequency in Hz, left phase minus right phase in radians.
    left_phase = [(100, -0.18), (400, -0.58), (950, -0.72), (1290, -0.63), (1550, -0.38), (2840, -0.46),
                  (3880, -0.098), (8000, -0.44)]
    bowl = wire_rattles() + wire_scrape() + rim_ring()
    hz = np.arange(N // 2 + 1) * SR / N
    left = undb(read_curve(left_db, hz) / 2) * np.exp(.5j * read_curve(left_phase, hz))
    direct = irfft(rfft(bowl + board_thuds()) * np.array([left, 1 / left]), N)
    return direct + kitchen_echo(bowl) + house_hum()


def record(dry):
    """Cuts the treble steeply above 11000 Hz."""
    return signal.sosfilt(signal.cheby1(14, .3, 11000, fs=SR, output="sos"), dry)


dry = scene()
out = record(dry)
master_out(out)
```